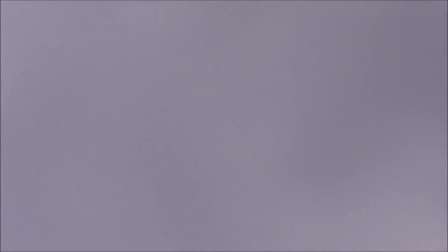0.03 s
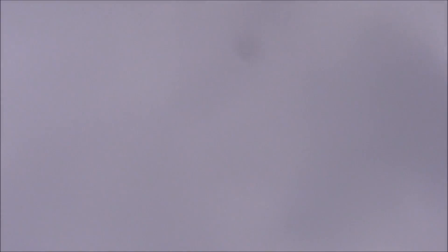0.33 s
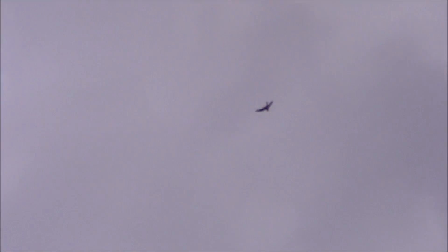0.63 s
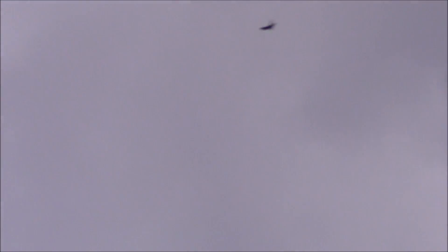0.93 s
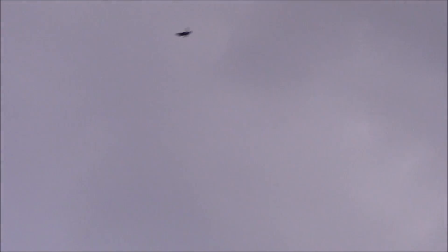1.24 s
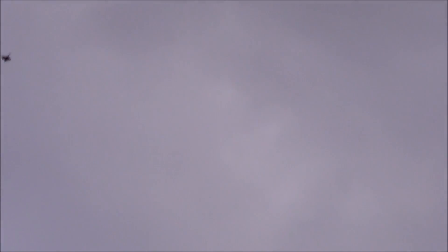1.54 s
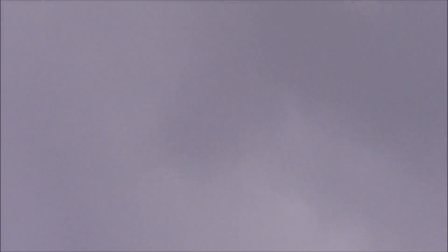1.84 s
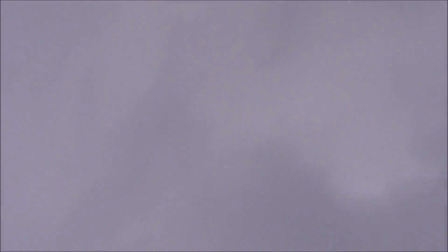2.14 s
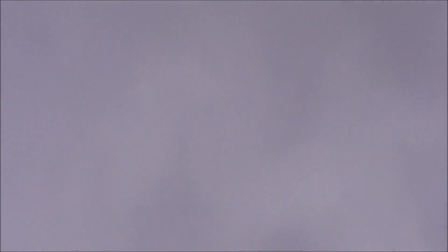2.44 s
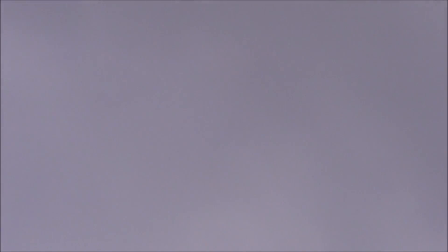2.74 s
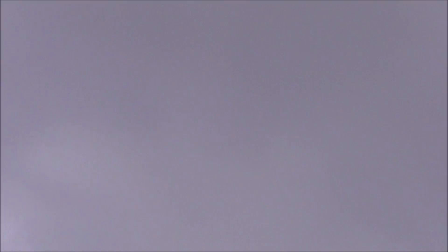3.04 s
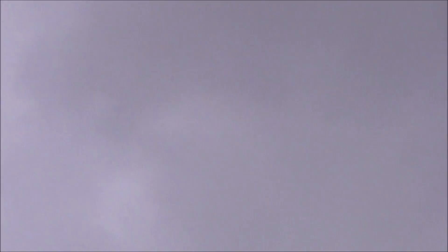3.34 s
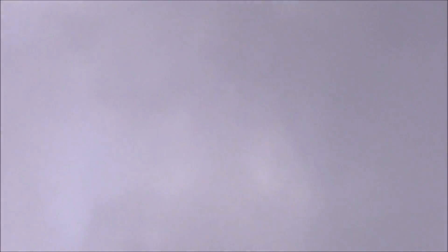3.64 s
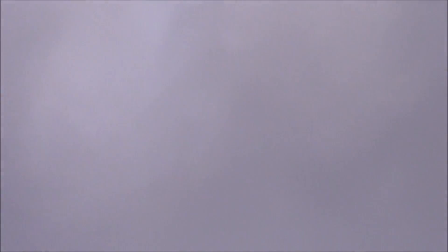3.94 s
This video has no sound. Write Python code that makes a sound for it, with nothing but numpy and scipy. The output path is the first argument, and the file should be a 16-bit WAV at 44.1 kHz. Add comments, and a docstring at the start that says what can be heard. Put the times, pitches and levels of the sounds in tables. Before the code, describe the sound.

Two crickets trill high and steadily throughout, outdoors, with softer, lower insect trills swelling behind them. A distant bird on the left repeats a thin falling whistle about every 0.8 seconds. Faint hoarse animal calls come between 1 and 2 seconds. At about 2.3 seconds a nearer bird gives one short falling rasp. A far engine drone swells slightly around 3 seconds, over soft air hiss and low rumble.

```python
"""Outdoors, in open air, two crickets trill by stridulation, a scraper drawn over a file; their
stroke rates differ, so they drift in and out of step. Lower trills swell behind them. A distant bird
repeats a thin falling whistle, nearly a pure tone, and a nearer one gives one rasp, a train of chirps.
An engine drones in three harmonics under broadband noise: soft air, a low rumble, a far insect chorus
and a distant rush. Other animals call faintly far away, each a rough resonance."""
import sys
import numpy as np
from scipy import signal
from scipy.fft import rfft, irfft
from scipy.io import wavfile
from scipy.ndimage import uniform_filter1d

SR = 44100
rng = np.random.default_rng(int(sys.argv[2]) if len(sys.argv) > 2 else 0)


def wav_record(signal):
    """Record a signal, one row per channel, as 16-bit PCM in the file named by sys.argv[1]."""
    frames = np.transpose(np.atleast_2d(signal))
    bounded = np.clip(frames, -1, 1)
    # unit amplitude maps onto the largest positive 16-bit level
    quanta = np.round(bounded * 32767).astype(np.int16)
    wavfile.write(sys.argv[1], SR, quanta)


N = 176400


def from_db(db):
    """Amplitude ratio of a level in decibels."""
    return 10 ** (np.asarray(db) / 20)


def unit_rms(x):
    """Normalisation to unit rms."""
    return x / np.sqrt(np.mean(x ** 2) + 1e-20)


def clock():
    """Time of each sample, t/s."""
    return np.arange(N) / SR


def bins():
    """Frequency of each Fourier component, f/Hz."""
    return np.arange(N // 2 + 1) * SR / N


def along(rows, at):
    """Linear interpolation of each column of a table against its first."""
    key, *columns = np.transpose(rows)
    return [np.interp(at, key, column) for column in columns]


def drift(corner_hz):
    """Random fluctuation: low-passed Gaussian noise of unit rms."""
    return unit_rms(irfft(rfft(rng.standard_normal(N)) / (1 + (bins() / corner_hz) ** 2), N))


def phase_of(hz):
    """Phase in radians, the time integral of angular frequency."""
    return 2 * np.pi * np.cumsum(hz * np.ones(N)) / SR


def pulse_train(cycles):
    """Cycle-to-cycle variation: the fraction of each cycle elapsed and three random values per cycle."""
    index = np.floor(cycles).astype(int)
    return cycles - index, rng.standard_normal((2048, 3))[index % 2048].T


def noise(spectrum, coherence):
    """Partial coherence: common and opposed noise add to a stereo pair of unit rms."""
    hz, db = np.transpose(spectrum)
    f = np.maximum(bins(), 1)
    gain = from_db(np.interp(np.log(f), np.log(hz), db)) * f / (f + 10)
    mid, side = rfft(rng.standard_normal((2, N))) * gain
    coherence = np.clip(coherence, 0, .999)
    signs = np.array([[1], [-1]])
    pair = np.sqrt(1 + coherence) * mid + np.sqrt(1 - coherence) * side * signs
    lead_rad = np.interp(f, [0, 600, 2400, 6000], [0, .58, .58, 0])  # midrange reaches the left first
    return unit_rms(irfft(pair * np.exp(.5j * lead_rad * signs), N))


def outdoors(x, echo_db, pan_db, lead_s=0.0, t60_s=.21):
    """Direct sound plus decaying scatter from ground and foliage; positive pan and lead mean left."""
    t = clock()[:SR // 2]
    tails = rng.standard_normal((2, len(t))) * from_db(-60 * t / t60_s) * (t > .004)
    tails /= np.sqrt(np.sum(tails ** 2, axis=1, keepdims=True))
    left = irfft(rfft(x) * np.exp(2j * np.pi * lead_s * bins()), N)
    direct = np.array([left * from_db(pan_db / 2), x * from_db(-pan_db / 2)])
    return direct + from_db(echo_db) * signal.fftconvolve(x[None], tails, axes=1)[:, :N]


# Stroke timing of each cricket: first stroke t/s, stroke rate/Hz
WING_TIMING = [(-.0020, 57.376), (.0100, 59.774)]
# Voice of each cricket: level/dB, stroke duration/s, shift in f/Hz, left minus right level/dB
CRICKET_VOICES = [(-19, .0104, 0, -1.9), (-22, .0104, 25, -0.5)]
# Frequency contour of a stroke: fraction of stroke, f/Hz
STROKE_CONTOUR = [(0, 8330), (.25, 8460), (.44, 8600), (.58, 8570), (.73, 8390), (.86, 8080), (1, 7600)]
# Envelope of a stroke: fraction of stroke, relative level/dB
STROKE_ENVELOPE = [(0, -26), (.08, -4), (.3, -1), (.74, -3), (.87, -10), (1, -17)]


def crickets(fade_db_per_s=.55, roughness=.054):
    """Stridulation: each wing stroke draws a scraper over a file, giving a tone that arches and drops."""
    t, out = clock(), 0
    for (first, rate), (db, length, shift, pan) in zip(WING_TIMING, CRICKET_VOICES):
        fraction, (detune, force, offset) = pulse_train((t - first) * rate)
        progress = fraction / rate / length
        hz = along(STROKE_CONTOUR, progress)[0] + shift + 22.59 * detune
        level = db + along(STROKE_ENVELOPE, progress)[0] + .15 * force - fade_db_per_s * t
        envelope = uniform_filter1d(from_db(level) * (progress > .02) * (progress < 1), size=16)
        # the file's teeth roughen both phase and amplitude
        phase = phase_of(hz) + np.pi * offset + roughness * drift(900)
        tone = np.sin(phase) * (1 + roughness * drift(680))
        out += outdoors(envelope * tone, echo_db=-28, pan_db=pan, lead_s=5e-6)
    return out


# Bouts of the lower trill: end t/s, time for the last 2.5 dB of rise/s, final level/dB
TRILL_BOUTS = [(.54, .75, -37), (1.62, 0.55, -37), (2.61, 0.55, -40), (3.54, 0.38, -36)]
# Farther insects: stroke rate/Hz, relative level/dB, stroke duration/s, start f/Hz, end f/Hz
TRILL_VOICES = [(57.24, 1.5, 0.01, 7500, 6300), (53.05, 3.5, .011, 7600, 6200)]


def low_trills():
    """Amplitude modulation: two trains of falling strokes share an envelope that swells and stops short."""
    t, swell, trills = clock(), 0, 0
    for end, rise, db in TRILL_BOUTS:
        level = db - 2.5 * np.clip((end - t) / rise, 0, 2) ** 3
        swell += from_db(level) * (t > end - 1.2 * rise) * (t < end)
    for rate, db, length, start_hz, end_hz in TRILL_VOICES:
        fraction, (detune, force, offset) = pulse_train(phase_of(rate + .37 * drift(1)) / (2 * np.pi))
        progress = np.minimum(fraction / rate / length, 1)
        hz = start_hz + (end_hz - start_hz) * progress ** 1.4 + 70 * detune
        envelope = from_db(db + 2.2 * force) * np.abs(np.sin(np.pi * progress)) ** .61
        trills += envelope * np.sin(phase_of(hz) + np.pi * offset)
    return outdoors(trills * uniform_filter1d(swell, size=400), echo_db=-4.5, pan_db=.3)


# Contour of the whistled phrase: t/s from its onset, f/Hz, relative level/dB
WHISTLE_CONTOUR = [(0, 4365, -13), (.012, 4720, 3.5), (.025, 4740, 1), (.055, 4330, -6), (.085, 4354, -9),
                   (.125, 4530, -1), (.172, 4492, -4.5), (.192, 4916, 4.5), (.215, 4483, 1.5),
                   (.235, 4500, 2.5), (.26, 4276, -3.5), (.29, 4140, 0.5), (.315, 4074, -6),
                   (.345, 3854, -5.5), (.39, 4030, -5.5), (.44, 3937, -5), (.49, 3830, -2)]
# Repeats: onset t/s, level/dB, shift in f/Hz, further shift of the ending/Hz, gain of the opening/dB
WHISTLE_REPEATS = [(-.33, -47.5, -2, 7, 0), (0.461, -49.5, -21, 209, 5.5), (1.214, -41.5, 9, -62.5, -7),
                   (2.003, -45, -64.5, 222, -0.5), (2.767, -44.5, 2.5, 8.5, 1.5), (3.85, -48, -50, 0, 0)]


def bird_whistles():
    """Frequency modulation of a pure tone: each phrase peaks twice, then falls in steps."""
    out = 0
    for onset, db, shift, ending_shift, opening_db in WHISTLE_REPEATS:
        t = clock() - onset
        hz, level = along(WHISTLE_CONTOUR, t)
        hz += shift + ending_shift * np.clip((t - .28) / .069, 0, 1) + 26 * drift(34.5)
        level += db + opening_db * np.clip((.14 - t) / .069, 0, 1) + 1.7 * drift(23)
        gate = uniform_filter1d(1. * (t > 0) * (t < WHISTLE_CONTOUR[-1][0]), size=300)
        out += gate * from_db(level) * np.sin(phase_of(uniform_filter1d(hz, size=300)))
    return outdoors(out, echo_db=-4, pan_db=-9.2, t60_s=.45)


# Envelope of the engine's second harmonic: t/s, rms level/dB
SECOND_HARMONIC = [(0, -62), (.6, -55.5), (1.7, -49.5), (2.4, -41), (3.0, -38.5), (3.6, -43), (3.82, -49.5),
                   (4, -68)]


def engine(fundamental_hz=84.2, sag_hz_per_s=.36):
    """Harmonic series: three wavering orders of a far engine, of which the second swells and fades."""
    t = clock()
    phase = phase_of(fundamental_hz - sag_hz_per_s * t + .17 * drift(2.2))
    levels = [-53 + 3 * drift(8.9),
              along(SECOND_HARMONIC, t)[0] + .34 * drift(5.7),
              -57.5 + 1.17 * drift(9.9)]
    return np.sqrt(2) * sum(from_db(db) * np.sin(order * phase) for order, db in enumerate(levels, 1))


# Spectrum of the open air: f/Hz, relative spectral density level/dB
AIR_SPECTRUM = [(100, -5), (250, 1), (400, 0), (800, 4), (1200, 2.5), (2000, -1), (2700, -7.5), (4000, -8),
                (5500, -11.5), (10000, -25), (13000, -16), (16000, -15)]


def open_air():
    """Stationary broadband noise: a soft hiss, wide where coherence is low, centred in the high treble."""
    coherence = np.interp(bins(), [4000, 11000], [.35, 1])
    return from_db(-40.5) * noise(AIR_SPECTRUM, coherence)


# Spectrum of the rumble: f/Hz, relative spectral density level/dB
RUMBLE_SPECTRUM = [(15, -1), (30, -2), (50, 0.5), (80, 1.5), (125, 0), (160, -7), (200, -14.5), (300, -21),
                   (600, -42), (3000, -100)]
# Envelope of the rumble: t/s, level/dB
RUMBLE_ENVELOPE = [(0, -42.5), (.85, -42.5), (1.03, -40), (1.2, -41.5), (2.4, -41.5), (3.45, -39.5),
                   (3.61, -36.5), (3.75, -39), (4, -42.5)]


def rumble(gust_db=1.6):
    """Random amplitude modulation: gusting low-frequency noise, nearly alike on both sides."""
    level = along(RUMBLE_ENVELOPE, clock())[0] + gust_db * drift(7)
    return from_db(level) * noise(RUMBLE_SPECTRUM, coherence=.97)


# Spectrum of the far insects: f/Hz, relative spectral density level/dB
CHORUS_SPECTRUM = [(5600, -32.5), (6300, -11), (7000, -1.5), (7600, -6.5), (8300, -3.5), (8800, 2),
                   (9300, -11.5), (10000, -32), (11000, -28)]


def insect_chorus():
    """Superposition: many far insects merge into a steady band of high noise."""
    return from_db(-39) * noise(CHORUS_SPECTRUM, coherence=.82)


# Spectrum of the rush: f/Hz, relative spectral density level/dB
RUSH_SPECTRUM = [(400, -33), (800, 0.5), (1200, -3.5), (1700, 0), (2100, -3.5), (2700, -14), (4000, -46)]
# Envelope of the rush: t/s, level/dB
RUSH_ENVELOPE = [(0, -68), (.85, -48.5), (1.08, -45), (1.35, -46), (1.65, -45), (2.0, -51), (3.4, -50.5),
                 (3.7, -47), (4, -43.5)]


def distant_rush():
    """Band-limited noise: a midrange rush that rises, recedes and rises again."""
    return from_db(along(RUSH_ENVELOPE, clock())[0]) * noise(RUSH_SPECTRUM, coherence=1)


# Calls blurred by distance: onset t/s, duration/s, centre f/Hz, bandwidth/Hz, level/dB
ANIMAL_CALLS = [(0.91, 0.44, 1185, 300, -45), (1.031, .05, 1560, 90, -44), (1.02, 0.29, 2100, 450, -49.5),
                (1.337, 0.33, 2120, 400, -50.5), (1.58, 0.23, 1995, 130, -49.5),
                (1.905, 0.032, 3000, 700, -50), (1.987, 0.08, 2860, 130, -52),
                (1.996, 0.053, 2540, 100, -46), (3.79, 0.31, 1710, 170, -49)]


def far_animals():
    """Resonance: each hoarse call is narrow-band noise about one frequency, swelling and fading."""
    t, out = clock(), 0
    for onset, length, hz, width_hz, db in ANIMAL_CALLS:
        envelope = np.sin(np.pi * np.clip((t - onset) / length, 0, 1) ** .67)
        phase = 2 * np.pi * hz * t
        band = drift(width_hz / 2) * np.sin(phase) + drift(width_hz / 2) * np.cos(phase)
        out += from_db(db) * envelope * band
    return outdoors(out, echo_db=0, pan_db=-2, lead_s=7e-5)


# Course of the rasp: t/s, starting f/Hz of each chirp, level/dB, duty cycle, pulse rate/Hz
RASP_COURSE = [(2.247, 3700, -42, .4, 240), (2.255, 4400, -24, 0.49, 240), (2.267, 4780, -17.5, 0.48, 235),
               (2.298, 4680, -19, 0.43, 237), (2.325, 4430, -21, .44, 228), (2.340, 4570, -19.5, 0.44, 250),
               (2.365, 4200, -24.5, 0.41, 228), (2.381, 3650, -26.5, 0.42, 238),
               (2.400, 3480, -25, 0.51, 270), (2.413, 3430, -23.5, 0.72, 280),
               (2.425, 3400, -42, 0.84, 280)]


def bird_rasp(early_sweep_hz=2700, late_sweep_hz=700):
    """Pulse modulation heard as roughness: rapid falling chirps sink in pitch and finally merge."""
    t = clock()
    start_hz, db, duty, rate = along(RASP_COURSE, t)
    fraction, (detune, force, offset) = pulse_train(phase_of(rate + 3 * drift(20)) / (2 * np.pi))
    progress = np.minimum(fraction / duty, 1)
    sweep_hz = np.interp(t, [RASP_COURSE[5][0], RASP_COURSE[-2][0]], [early_sweep_hz, late_sweep_hz])
    phase = phase_of(start_hz - sweep_hz * progress ** 5 + 50 * detune)
    # the phase restarts near zero with every chirp
    chirp_starts = np.diff(fraction, prepend=1) < 0
    phase = phase - np.maximum.accumulate(phase * chirp_starts) + .55 * offset
    tone = np.sin(phase) + from_db(-13) * np.sin(2 * phase)
    envelope = from_db(db + 1.8 * force) * np.abs(np.sin(np.pi * progress)) ** 1.2
    gate = (t > RASP_COURSE[0][0]) * (t < RASP_COURSE[-1][0])
    return outdoors(gate * envelope * tone, echo_db=-12, pan_db=.1, lead_s=1.6e-5)


def scene():
    """Linear superposition: the pressures of all sources add."""
    return (crickets() + low_trills() + bird_whistles() + engine() + open_air() + rumble()
            + insect_chorus() + distant_rush() + far_animals() + bird_rasp())


def record(dry):
    """Band limiting: a steep zero-phase low-pass filter cuts the treble above 15.7 kHz."""
    return signal.sosfiltfilt(signal.ellip(10, .05, 70, 15700, fs=SR, output="sos"), dry)


dry = scene()
out = record(dry)
wav_record(out)
```